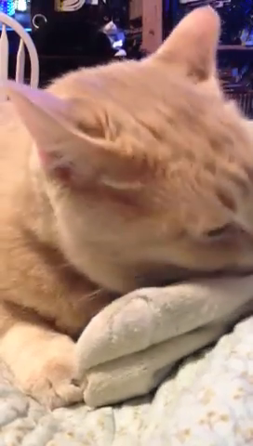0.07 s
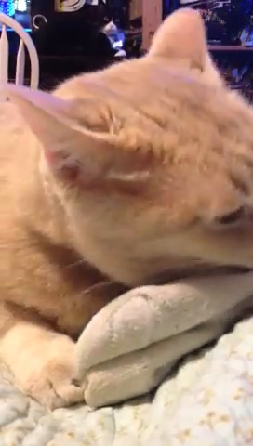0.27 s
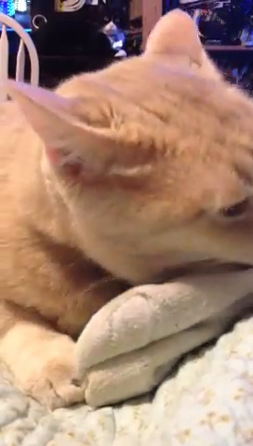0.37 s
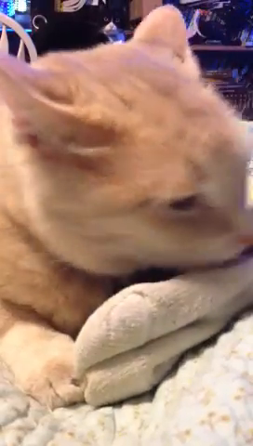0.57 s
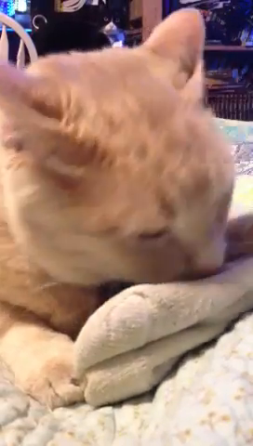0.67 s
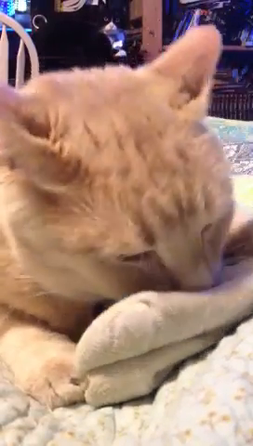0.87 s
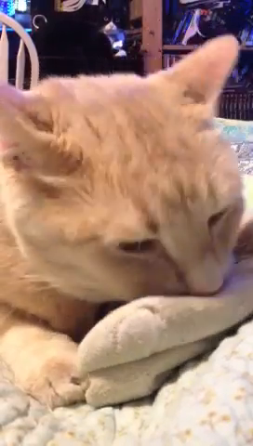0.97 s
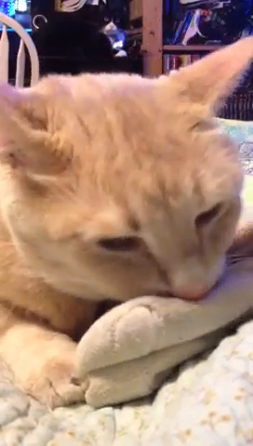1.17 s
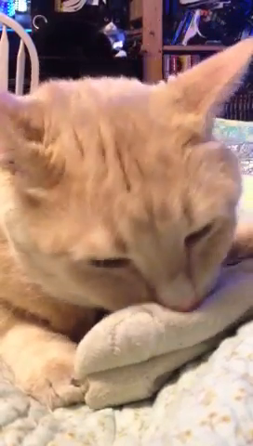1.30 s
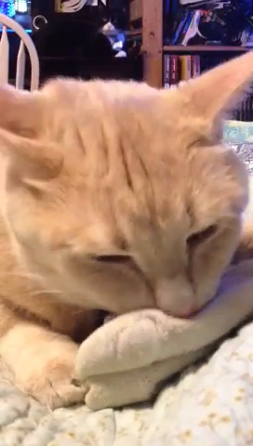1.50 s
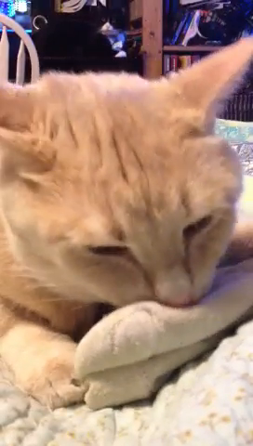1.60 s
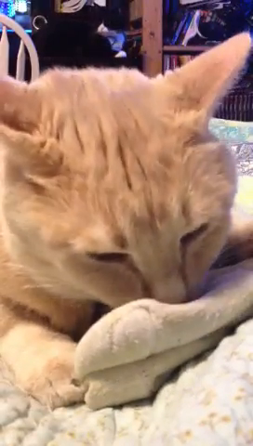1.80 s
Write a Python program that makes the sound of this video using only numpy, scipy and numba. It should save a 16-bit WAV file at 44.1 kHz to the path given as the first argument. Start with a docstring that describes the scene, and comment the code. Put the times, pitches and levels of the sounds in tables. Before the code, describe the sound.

A cat gives one low, rough growl close by in a quiet room.

```python
"""A cat's low growl

A cat lying on a bed gives one low growl with its mouth shut, close by, in a quiet room.
Uneven pulses of its vocal folds make the throat ring; the growl catches once, holds, then sinks
and weakens. Cloth is brushed briefly, the bed takes a few soft bumps, and a faint squeak passes."""
import sys
import numpy as np
from scipy import signal
from scipy.fft import rfft, irfft
from scipy.io import wavfile
from scipy.ndimage import uniform_filter1d
from numba import njit

SR = 44100
rng = np.random.default_rng(int(sys.argv[2]) if len(sys.argv) > 2 else 0)


def put_to_file(sound):
    """Save the sound as 16-bit audio at rate SR, in the file named by the first command-line argument."""
    columns = np.atleast_2d(sound).T  # one column per channel
    safe = np.clip(columns, -1, 1)
    whole_steps = np.round(safe * 32767)
    wavfile.write(sys.argv[1], SR, whole_steps.astype(np.int16))


N = 81585

# The room's low noise. Each row: frequency in Hz, relative level in dB.
ROOM_TONE = [(25,-55),(50,-20),(80,-16),(115,0.5),(200,1.5),(270,2),(380,1),(520,-2),(750,-11.5),(1200,-14.5),(2000,-18.5),(3000,-24),(7000,-36),(15000,-40)]
# A fine hiss. Each row: frequency in Hz, relative level in dB.
HISS_TONE = [(1000,-12.5),(3500,0),(7000,1),(8700,-1.5),(10300,-6.5),(12500,0),(15000,-5)]
# The hiss easing off. Each row: time in seconds, level in dB.
HISS_FADE = [(0,-63.5),(.15,-67.5),(.45,-67.5),(1.0,-68.5),(1.85,-70.5)]
# Soft bumps on the bed. Each row: time in seconds, level in dB, pitch in Hz, fade time in seconds.
BED_BUMPS = [(.168,-60,150,0.0048),(.22,-41.5,197,0.0043),(.44,-64,166,0.0084),(1.637,-48,116,0.0067)]
# Brushes of cloth. Each row: start in seconds, level in dB, rise and fade times in seconds.
CLOTH_BRUSHES = [(.275,-66,0.023,0.04),(.54,-58,0.019,0.022),(0.628,-42.5,0.016,0.028)]
# The sound of rubbing cloth. Each row: frequency in Hz, relative level in dB.
CLOTH_TONE = [(500,-2.5),(1200,-3),(1900,-1.5),(2600,-4),(4000,0),(7500,2),(10000,-3.5),(15000,-6)]
# Fibres that snag and let go. Each row: start in seconds, level in dB, band centre and width in Hz.
FIBRE_SNAGS = [(.557,-55.5,9000,4000),(.6305,-39.5,3500,6000),(.6415,-38.5,12000,9000),(.6485,-44,3000,4000)]
# How fast the vocal folds pulse. Each row: time in seconds, pitch in Hz.
GROWL_PITCH = [(0.28, 148.7), (0.326, 149.2), (0.364, 167.6), (0.39, 159.2), (0.492, 151.5), (0.522, 155.2),
               (0.59, 141.4), (0.64, 149.1), (0.682, 135.8), (0.718, 150.9), (0.774, 152.2), (0.836, 148.5),
               (0.874, 152.9), (0.892, 150.5), (0.97, 148.1), (0.988, 152.4), (1.046, 138.4),
               (1.206, 123.8), (1.234, 116.5), (1.264, 114.9), (1.32, 109.0), (1.356, 107.2),
               (1.442, 114.4), (1.56, 107.1)]
# How hard the cat growls. Each row: time in seconds, level in dB.
GROWL_EFFORT = [(.272,-52),(.285,-40),(.316,-39),(.338,-60),(.358,-38),(.41,-39.5),(.5,-37.5),(.55,-37),(.61,-39.5),(.685,-40),(.72,-38),(.96,-39),(1.11,-38),(1.2,-43),(1.31,-41),(1.365,-45),(1.44,-43),(1.48,-40),(1.505,-46.5),(1.555,-45.5)]
# How unevenly the folds move. Each row: time in seconds, roughness from 0 to 1.
ROUGHNESS = [(.28,.7),(.36,.55),(.41,.55),(.44,.9),(.48,.42),(.62,.5),(.7,.5),(.97,.55),(1.07,.28),(1.13,.33),(1.21,.68),(1.3,.42),(1.37,.72),(1.45,.27),(1.56,.35)]
# How the throat shapes the sound. Each row: frequency in Hz, relative level in dB.
THROAT_TONE = [(50,-41.5),(100,-13),(150,-3.5),(220,-4.5),(305,-2.5),(400,-3),(460,-6.5),(540,-9),(630,-6),(740,-21),(900,-13.5),(1100,-10),(1300,-39),(3000,-43.5)]
# The mouth rings higher as the cat presses, lower as it slackens.
# Each row: time in seconds, frequency in Hz.
MOUTH_RING = [(.3,424),(.38,387),(.52,460),(.75,444),(.95,411),(1.11,420.9),(1.27,400.4),(1.55,372.8)]
# The higher ringing of the muzzle. Each row: frequency in Hz, relative level in dB.
MUZZLE_TONE = [(300,-36.5),(700,-7.5),(810,3.5),(900,5),(990,0),(1100,2),(1280,-22),(2100,-19.5),(3200,-24.5),(8000,-68.5)]
# How loud the muzzle is next to the throat. Each row: time in seconds, level in dB.
MUZZLE_LEVEL = [(.3,-21.5),(.37,-37),(.52,-25.5),(.64,-16.5),(.8,-17),(.95,-21),(1.13,-22),(1.3,-21),(1.55,-19)]


def undb(db):
    """Turn decibels into a number to multiply by."""
    return 10 ** (np.asarray(db) / 20)


def unit(x):
    """Scale a sound so its average (rms) level is 1."""
    return x / np.sqrt(np.mean(x ** 2))


def curve(rows, t):
    """Join (time, value) rows with straight lines."""
    return np.interp(t, *np.array(rows, float).T)


def noise():
    """White noise."""
    return rng.standard_normal(N)


def wander(rate):
    """A smooth random drift; a higher rate makes it quicker."""
    size = int(SR / rate)
    return unit(uniform_filter1d(uniform_filter1d(noise(), size), size))


def colour(x, tone):
    """Make each frequency louder or softer, following a tone table."""
    size = 8192
    hz, db = np.array(tone, float).T
    grid_hz = np.arange(size // 2 + 1) * SR / size + 1
    gain = undb(np.interp(np.log(grid_hz), np.log(hz), db))
    # Build the filter so it rings only after a sound, never before.
    cepstrum = irfft(np.log(gain))
    cepstrum[1:size // 2] *= 2
    cepstrum[size // 2 + 1:] = 0
    return signal.fftconvolve(x, irfft(np.exp(rfft(cepstrum))))[:N]


def ring(x, hz, width_hz):
    """Keep one band of frequencies, filtering twice for steep sides."""
    b, a = signal.iirpeak(hz, hz / min(width_hz, SR / 4), fs=SR)
    return signal.lfilter(b, a, signal.lfilter(b, a, x))


def background(t):
    """Low room noise and a fine hiss that eases off."""
    room = undb(-53.5) * unit(colour(noise(), ROOM_TONE))
    hiss = undb(curve(HISS_FADE, t)) * unit(colour(noise(), HISS_TONE))
    return room + hiss


def room_echo(sound, t, fade_s=.3, level_db=-15):
    """A furnished room sends back a short, soft echo."""
    tail = noise() * undb(-60 * t / fade_s) * (t > .006)
    return undb(level_db) * signal.fftconvolve(sound, tail / np.linalg.norm(tail))[:N]


def squeak(t, peak_s=1.482, fade_s=.016):
    """A faint, airy whistle that comes and goes."""
    whistle = unit(ring(noise(), hz=5800, width_hz=250))
    return undb(-63.5) * np.exp(-((t - peak_s) / fade_s) ** 2) * whistle


def bed_bumps(t):
    """Padded knocks, each only a wave or two long."""
    return sum(undb(db) * np.exp(-((t - at) / fade) ** 2) * np.sin(2 * np.pi * hz * (t - at))
               for at, db, hz, fade in BED_BUMPS)


def cloth(t, grain_db=.5, snap_s=.002):
    """Grainy rubbing starts on contact, swells and dies away; single fibres snap free."""
    push = snaps = 0
    for start, db, rise, fade in CLOTH_BRUSHES:
        age = t - start
        swell = np.interp(age, [0, rise], [.1, 1], left=0)
        push += undb(db) * swell * np.exp(-np.maximum(age - rise, 0) / fade)
    grain = undb(grain_db * unit(uniform_filter1d(noise(), size=70)))
    for start, db, hz, width in FIBRE_SNAGS:
        burst = (t > start) * np.exp(-np.abs(t - start) / snap_s)
        snaps += undb(db) * burst * unit(ring(noise(), hz, width))
    return push * unit(colour(grain * noise(), CLOTH_TONE)) + snaps


def vocal_folds(t, jitter_s=.00039, shimmer_db=2.2, flutter_hz=66, flutter_s=.0003):
    """The folds give uneven pulses, each followed by a puff of air."""
    hz = curve(GROWL_PITCH, t) * (1 + .005 * wander(rate=60))
    cycles = np.cumsum(hz) / SR
    beats = t[1:][np.diff(np.floor(cycles)) > 0]
    rough = curve(ROUGHNESS, beats)
    # Chance makes each pulse early or late (jitter) and strong or weak (shimmer).
    jitter, shimmer = rng.standard_normal((N // 100, 2))[:len(beats)].T
    # A slower flutter also pulls the timing back and forth, adding a rattle.
    flutter = np.sin(2 * np.pi * flutter_hz * beats)
    late = rough * (jitter_s * jitter + flutter_s * flutter)
    at = np.clip(((beats + late) * SR).astype(int), 0, N - 1)
    pulses = np.bincount(at, undb(shimmer_db * rough * shimmer), N) / np.sqrt(hz)
    air = np.exp(-(cycles % 1) / .4) * noise() * curve(ROUGHNESS, t)
    return unit(pulses), unit(air)


@njit
def mouth_cavity(x, hz, damping):
    """The space in the mouth rings at a moving frequency and softens what lies above it."""
    y, band, low = np.empty(len(x)), 0., 0.
    for i in range(len(x)):
        tuning = np.tan(np.pi * hz[i] / SR)
        ringing = (band + tuning * (x[i] - low)) / (1 + tuning * (tuning + damping))
        y[i] = low + tuning * ringing
        band, low = 2 * ringing - band, 2 * y[i] - low
    return y


def growl(t, end_s=1.559, release_s=.006):
    """Pulses and air from the vocal folds ring the throat, the shut mouth and the muzzle."""
    pulses, air = vocal_folds(t)
    throat = colour(pulses + undb(-21) * air, THROAT_TONE)
    throat = unit(mouth_cavity(throat, curve(MOUTH_RING, t), damping=.43))
    muzzle = unit(colour(pulses + undb(-4) * air, MUZZLE_TONE))
    started = t > GROWL_EFFORT[0][0]
    release = np.exp(-np.maximum(t - end_s, 0) / release_s)
    effort = undb(curve(GROWL_EFFORT, t)) * started * release
    return effort * (throat + undb(curve(MUZZLE_LEVEL, t)) * muzzle)


def scene():
    """Add up the close sounds, their echo and the background."""
    t = np.arange(N) / SR
    close = growl(t) + cloth(t) + bed_bumps(t) + squeak(t)
    return (close + room_echo(close, t) + background(t))[None]


def record(dry):
    """Cut away the highest treble."""
    top_hz = 15200
    return signal.sosfilt(signal.ellip(10, .2, 70, top_hz, fs=SR, output="sos"), dry)


dry = scene()
out = record(dry)
put_to_file(out)
```